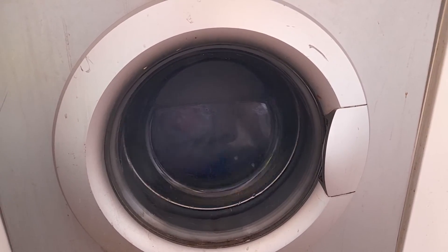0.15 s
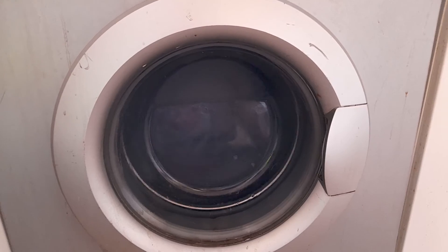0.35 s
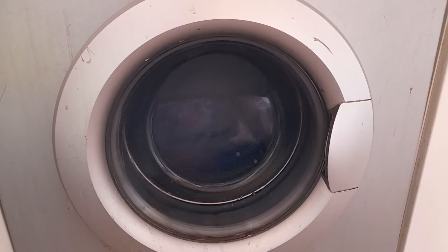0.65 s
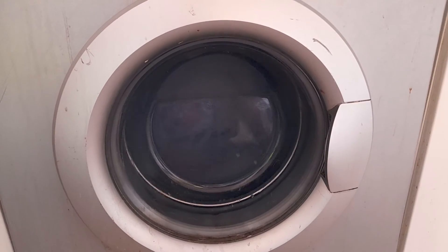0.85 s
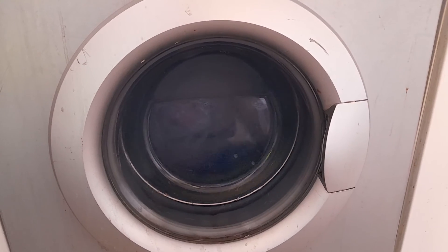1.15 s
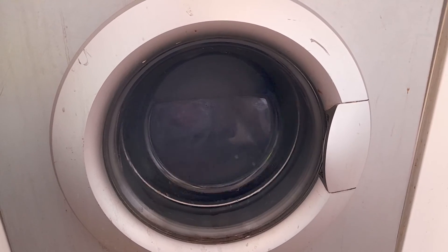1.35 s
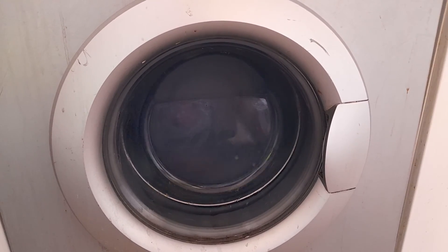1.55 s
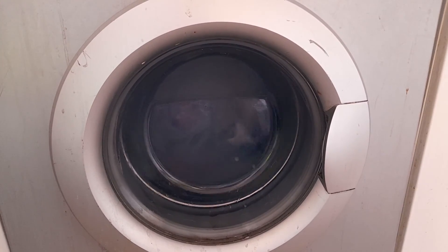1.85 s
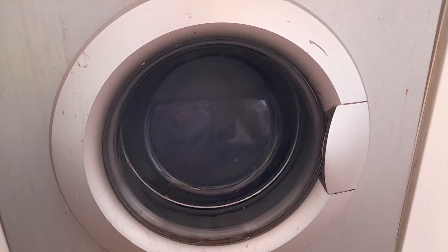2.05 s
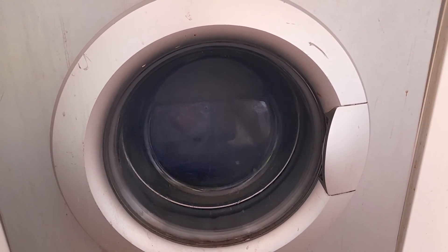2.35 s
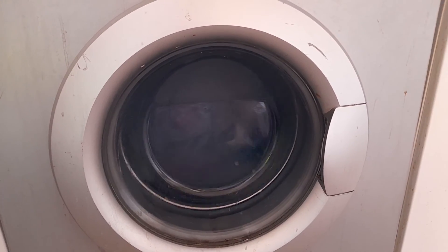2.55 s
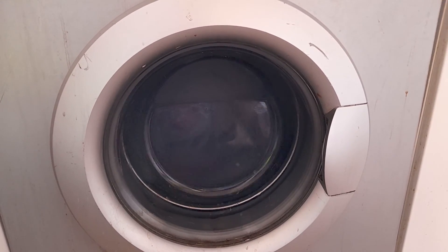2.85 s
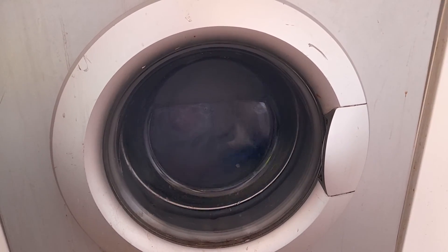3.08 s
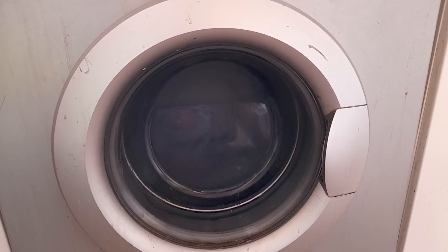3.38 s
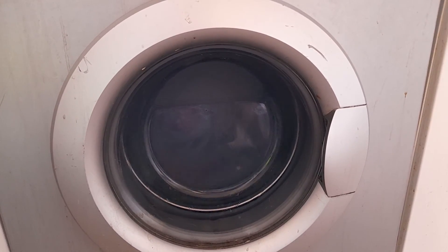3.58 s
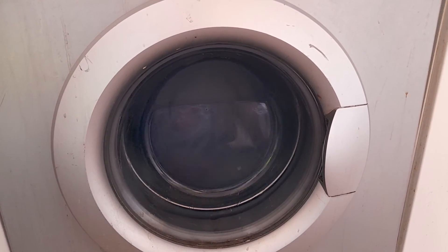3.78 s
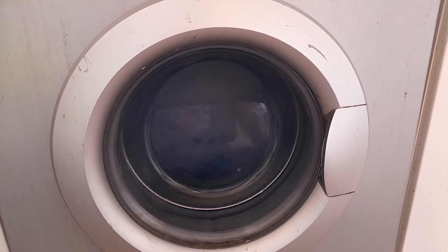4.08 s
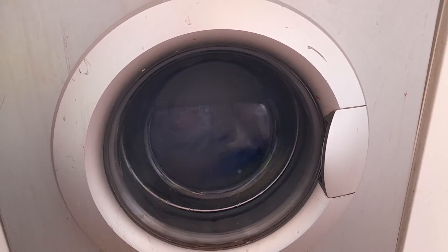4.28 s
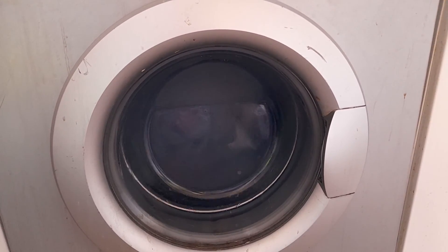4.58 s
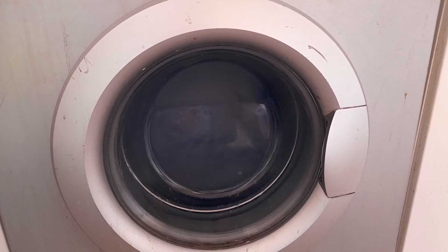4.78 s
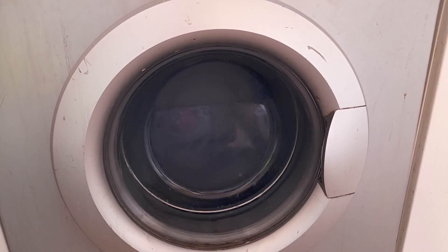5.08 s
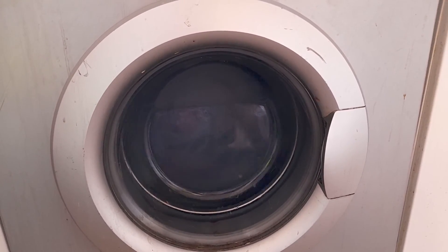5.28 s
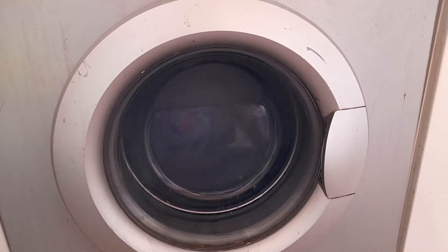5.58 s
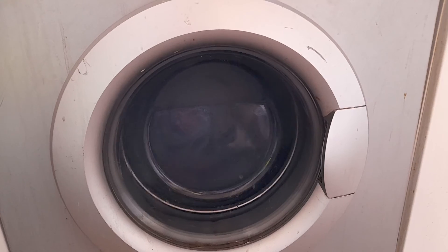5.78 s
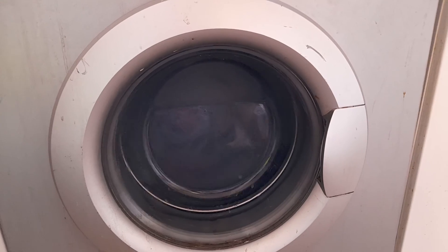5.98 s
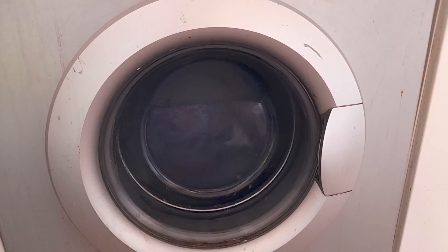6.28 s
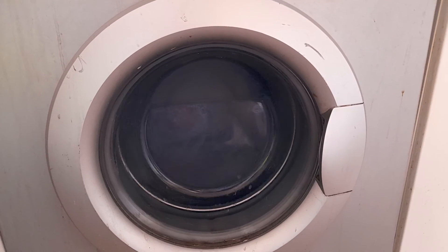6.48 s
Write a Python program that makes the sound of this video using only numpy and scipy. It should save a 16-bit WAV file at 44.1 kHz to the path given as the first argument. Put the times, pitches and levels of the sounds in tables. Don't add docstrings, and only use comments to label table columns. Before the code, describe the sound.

From 0 s a front-loading washing machine is in full spin, close to a stereo microphone in a small hard home room with short reflections. A strong, slightly rough motor whine, with its base near 2.6 kHz and glittering overtones above, slides smoothly down to about 2 kHz by 6.6 s, flickering differently at each ear. Under it an uneven drum load thumps rapidly, just over twelve times a second at first and slowing to under ten, ringing the steel cabinet as a low throbbing drone. A low hum near 140 Hz is strongest in the first second, then fades. Coarse midrange bearing roar runs throughout, fluttering, with small jolts around 1.3 and 1.7 s, a swell near 2.9 s, a brief dip at 4 s and more lurches from 5.2 to 6.4 s. Airy hiss softens slightly. The drum is still turning at the end.

```python
import sys
import numpy as np
from scipy import signal
from scipy.fft import rfft, irfft
from scipy.io import wavfile

SR = 44100
rng = np.random.default_rng(int(sys.argv[2]) if len(sys.argv) > 2 else 0)


def amplitude_ratio(level_db):
    exponent = np.asarray(level_db, float) / 20
    return 10 ** exponent


def dump(signal):
    limited = np.clip(np.atleast_2d(signal).T, -1, 1)
    pcm = np.round(limited * 32767).astype(np.int16)
    wavfile.write(sys.argv[1], SR, pcm)


N = 292824
T, HZ = np.arange(N) / SR, np.fft.rfftfreq(N, 1 / SR)
SLOTS = 18
DRUM_PER_SHAFT = 0.086222


def evened(x):
    return x / np.sqrt(np.mean(x ** 2) + 1e-20)


def read(points, hz):
    f, value = np.transpose(points)
    return np.interp(np.log(hz + 1), np.log(f + 1), value)


def peaks(modes, hz, valley_db):
    power = amplitude_ratio(valley_db) ** 2
    for f, width, db in modes:
        power = power + amplitude_ratio(db) ** 2 / (1 + (2 * (hz - f) / width) ** 2) ** 2
    return np.sqrt(power)


def through(x, modes, valley_db):
    size = 32768
    log_gain = np.log(peaks(modes, abs(np.fft.fftfreq(size, 1 / SR)), valley_db))
    response = np.exp(np.conj(signal.hilbert(log_gain)))
    ring = np.fft.ifft(response).real[:size // 2]
    return signal.oaconvolve(x, ring)[:N]


def drift(hz):
    spectrum = rfft(rng.standard_normal(N)) / (1 + (HZ / hz) ** 4)
    return evened(irfft(spectrum, N))


def repeated(orders, db, phase, turns):
    size = 16384
    spectrum = np.zeros(size // 2 + 1, complex)
    spectrum[orders] = amplitude_ratio(db) * np.exp(1j * phase) * size / np.sqrt(2)
    one_turn = irfft(spectrum, size)
    return np.interp(turns % 1 * size, np.arange(size), one_turn, period=size)


# (t/s, shaft rate f/Hz)
SHAFT_RATE = [
    (0, 143.209),
    (2.49, 131.43),
    (4.15, 123.719),
    (6.64, 112.495),
]


def coast_down():
    return np.polyval(np.polyfit(*np.transpose(SHAFT_RATE), deg=3), T)


SPEED = coast_down()
TURNS = np.cumsum(SPEED) / SR
DRUM = DRUM_PER_SHAFT * TURNS

# (centre level/dB, first side order level/dB, fall per further side order/dB, brush hiss level/dB)
WHINE_ORDERS = [(-50, -59.5, 5, -66), (-42.5, -50.5, 9, -57), (-51, -59, 2.5, -59), (-44.5, -51, 6.5, -56),
                (-59, -59.5, 5, -66), (-53.5, -53.5, 5, -64), (-62, -64, 4, -69)]
# (f/Hz, width/Hz, level/dB)
LEFT_PATH = [(1860, 67, -23), (2080, 67, -3), (2557, 68, -5), (2600, 300, 5), (4096, 270, -2.5),
             (4420, 280, 2.5), (4924, 370, 1), (5134, 110, 1.5), (6500, 900, -9), (7170, 1300, 1),
             (8060, 1700, 2.5), (10400, 1100, -4), (12700, 2700, 4), (14750, 1600, -3.5)]
RIGHT_PATH = [(1970, 390, -12), (2370, 150, 12.5), (2562, 21, 13), (4090, 270, -3), (4580, 470, 2),
              (4603, 150, 5.5), (5350, 760, 1), (6320, 700, -1), (7345, 350, 7.5), (7560, 2400, 1),
              (8590, 270, 1), (10200, 1500, 1), (11600, 2500, 1.5), (14500, 3700, -1)]


def motor(wobble=0.0018, second=0.0008, shake=0.0012, scatter_db=2.0, far_db=-70, hiss_width=300, rock_db=1.1):
    tug = wobble * np.sin(2 * np.pi * DRUM) + second * np.sin(4 * np.pi * DRUM + 1.9)
    angle = TURNS + tug + shake * drift(20)

    half = SLOTS // 2
    orders = np.arange(half, SLOTS * len(WHINE_ORDERS) + half)
    group = (orders - half) // SLOTS
    away = abs((orders - half) % SLOTS - half)
    centre_db, side_db, fall_db, _ = np.transpose(WHINE_ORDERS)[:, group]
    db = np.maximum(side_db - fall_db * (away - 1), far_db - 0.86 * away)
    db = db + scatter_db * rng.standard_normal(len(orders)) * (away > 1)
    db = np.where(away == 0, centre_db, db)
    phase = 2 * np.pi * rng.random(len(orders))

    out = np.zeros((2, N))
    rocking, rubbing = rock_db * drift(20), drift(hiss_width)
    for k, row in enumerate(WHINE_ORDERS):
        mine = group == k
        tone = repeated(orders[mine], db[mine], phase[mine], angle)
        carrier = amplitude_ratio(row[3]) * np.sqrt(2) * np.cos(2 * np.pi * (k + 1) * SLOTS * TURNS)
        for ear in range(2):
            shift = rng.integers(N)
            flicker = amplitude_ratio(np.sqrt(k + 1) * np.roll(rocking, shift))
            out[ear] += flicker * (tone + np.roll(rubbing, shift) * carrier)
    return np.array([through(out[0], LEFT_PATH, -9), through(out[1], RIGHT_PATH, -5)])


def room(x, t60=0.3, wet_db=-9, step=1.9):
    knots = np.arange(0, SR, 45.0)
    wander = np.cumsum(step * rng.standard_normal((2, len(knots))), axis=1)
    phase = np.array([np.interp(HZ, knots, w) for w in wander])
    ears = irfft(rfft(x) * np.exp(1j * phase), N)

    t = np.arange(SR // 3) / SR
    signs = rng.choice([-1.0, 1.0], (2, len(t)))
    sparse = rng.random((2, len(t))) < 0.05
    taps = signs * sparse * amplitude_ratio(-60 * t / t60) * (t > 0.006)
    taps *= amplitude_ratio(wet_db) / np.linalg.norm(taps, axis=1)[:, None]
    taps[:, 0] = 1
    return signal.fftconvolve(ears, taps / np.linalg.norm(taps[0]), axes=1)[:, :N]


UNEVEN_ORDERS = {5: -1.6, 7: 4.5, 8: 2.1, 10: -1.5, 11: 1.7, 13: 4.4, 17: 3.4}
# (f/Hz, width/Hz, level/dB)
CABINET_MODES = [(34, 6, -39), (65, 13, -25), (86.7, 6.2, -20.5), (110.5, 17, -12.5), (115.9, 4, -6),
                 (128.6, 18, -19), (142, 9, 0.5), (150.2, 14, -5.5), (165.4, 7.7, -6), (180.7, 11.4, -9),
                 (209.2, 12.3, -9.5), (299, 46, -14)]


def drum(start=0.807, smear=0.00708, uneven=0.058):
    orders = np.arange(3, 28)
    db = -22 - 1.25 * orders
    db = db + (orders % 2 == 0) * np.minimum(-15.5 + 1.07 * orders, 0)
    db = db + [UNEVEN_ORDERS.get(k, 0) for k in orders]
    phase = -2 * np.pi * (orders * start + smear * (orders - 12) ** 2)
    thump = repeated(orders, db, phase, DRUM) * (1 + uneven * drift(1.9))
    return through(thump, CABINET_MODES, -51.0)


# (f/Hz, width/Hz, level/dB)
HUM_MODES = [(140.5, 6, -32), (128, 6.9, -59)]


def hum(throb=0.032):
    level = peaks(HUM_MODES, SPEED, -73) * (1 + throb * np.cos(2 * np.pi * DRUM))
    turn_hz, half_width_hz = 139.5, 2
    lead = 2.3 - np.arctan((SPEED - turn_hz) / half_width_hz)
    fundamental = np.sqrt(2) * level * np.sin(2 * np.pi * TURNS + lead)
    return fundamental + amplitude_ratio(-53.5) * np.sin(4 * np.pi * TURNS)


# (f/Hz, left-right coherence)
COHERENCE = [(30, .3), (60, 0.29), (130, 0.87), (290, 0.94), (640, 0.76), (1200, 0.42), (2500, 0.39),
             (8000, 0.041)]
# (f/Hz, left minus right level/dB)
BALANCE = [(60, -2), (380, -0.5), (950, -0.5), (1400, -7.5), (2380, -6), (4400, 2), (15000, 2.5)]


def pair(gain, lag=0.0001):
    a, b = rfft(rng.standard_normal((2, N)))
    same, lean = np.clip(read(COHERENCE, HZ), -1, 1), amplitude_ratio(read(BALANCE, HZ) / 2)
    late = a * np.exp(-2j * np.pi * HZ * lag)
    left = a * lean
    right = (same * late + np.sqrt(1 - same ** 2) * b) / lean
    return irfft(gain * np.array([left, right]), N)


# (t/s, level/dB)
ROAR_EFFORT = [
    (0.0, -38),
    (0.03, -31.5),
    (1.05, -30.5),
    (2.4, -33),
    (2.55, -32),
    (2.59, -34),
    (2.92, -29.5),
    (2.94, -31),
    (6.55, -31.5),
    (6.64, -34),
]
# (f/Hz, width/Hz, level/dB)
TUB_MODES = [(314.3, 32, -10.5), (353, 25, -10.5), (417.2, 48.4, -7), (557.4, 90, -11), (660.4, 59, -1),
             (695, 55, -0.5), (731.4, 38, 0.5), (808, 58, -0.5), (840.5, 27, -3), (887.5, 27, -4),
             (964.5, 67, -4.5), (1096, 226, -11.5), (1175, 41, -8), (1467, 39, -16), (1780, 105, -16),
             (1864, 29, -13.5), (2450, 260, -23.5)]
# (t/s, level change/dB, length/s)
SURGES = [(0.203, 1.5, 0.062), (0.935, 3.5, 0.019), (1.34, 5, 0.023), (1.532, -3.5, 0.025),
          (1.698, 6, 0.013), (2.478, 4, 0.016), (2.543, 4.5, 0.023), (2.683, 5, 0.025), (2.77, 4.5, 0.015),
          (2.895, 1.5, .05), (3.764, 3, 0.028), (4.006, -9, 0.017), (4.105, 1, 0.06), (4.16, -3, 0.039),
          (5.203, -2.5, 0.03), (5.263, 3.5, .02), (5.463, 3, 0.019), (5.575, 5.5, 0.015),
          (5.716, 3.5, 0.035), (5.853, -3.5, 0.018), (5.895, 3, 0.049), (6.05, 3.5, 0.061),
          (6.16, -6, 0.017), (6.19, 4.5, 0.033), (6.285, -5, 0.013), (6.391, 8, 0.011)]


def roar(flutter_db=1.35, sway_db=0.43, beat_db=0.5, beat_lead=4.2, top_hz=1100, trim_db=-0.84):
    body = peaks(TUB_MODES, HZ, -26.0) / (1 + (HZ / 3000) ** 4) / (1 + (230 / (HZ + 1)) ** 6)
    high = 1 / (1 + (top_hz / (HZ + 1)) ** 8)
    core, edge = pair(body * np.sqrt(1 - high)), pair(body * np.sqrt(high))
    scale = 1 / np.sqrt(np.mean(core.mean(0) ** 2))
    shudder = amplitude_ratio(flutter_db * drift(60) + sway_db * drift(5.9))
    surge_db = sum(db * np.exp(-((T - s) / length) ** 2) for s, db, length in SURGES)
    effort_db = np.interp(T, *np.transpose(ROAR_EFFORT)) + trim_db + surge_db
    edge_db = -28 - 0.96 * T + 0.3 * surge_db
    edge_db = edge_db + beat_db * np.cos(2 * np.pi * DRUM + beat_lead)
    return scale * shudder * (amplitude_ratio(effort_db) * core + amplitude_ratio(edge_db) * edge)


# (f/Hz, spectral level/dB per Hz)
WASH_SPECTRUM = [(25, -28), (60, -27), (140, 2.5), (250, -5), (700, -11.5), (1320, -12), (1810, -13),
                 (3140, -21.5), (4650, -15.5), (5700, -27), (7090, -21), (14000, -20.5), (15200, -34),
                 (16000, -46)]


def wash():
    air = evened(pair(amplitude_ratio(read(WASH_SPECTRUM, HZ))))
    return amplitude_ratio(-39.5) * air * (SPEED / SPEED.mean()) ** 0.24


def scene():
    return room(motor()) + drum() + hum() + roar() + wash()


def band_limit(x):
    return signal.sosfilt(signal.butter(12, 16250, fs=SR, output="sos"), x)


def record(dry):
    lowpass = signal.firwin(511, 15800, window=("kaiser", 9), fs=SR)
    band = signal.oaconvolve(dry, lowpass[None], "same")
    return band_limit(band)


dry = scene()
out = record(dry)
dump(out)
```